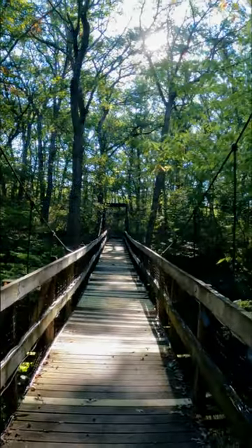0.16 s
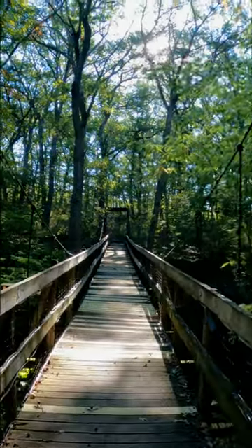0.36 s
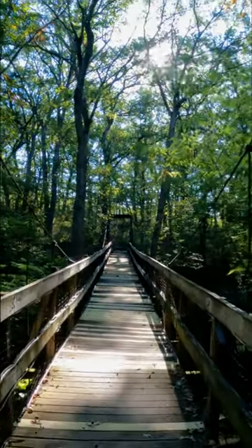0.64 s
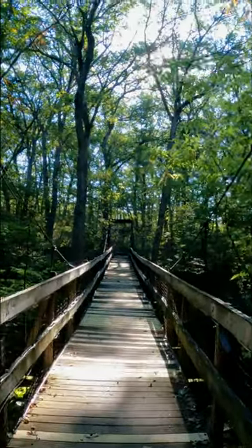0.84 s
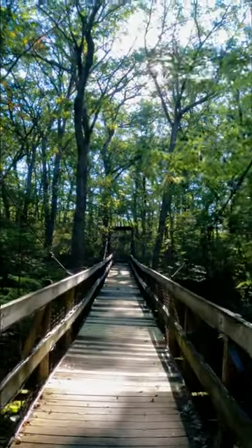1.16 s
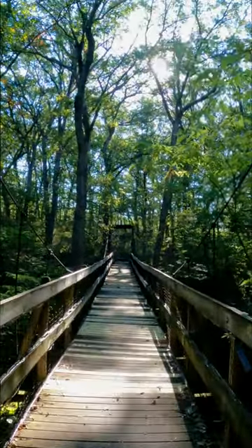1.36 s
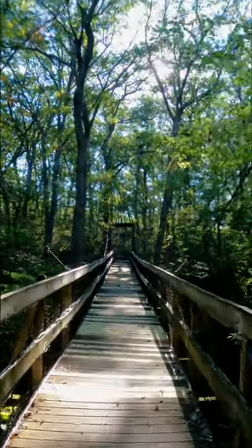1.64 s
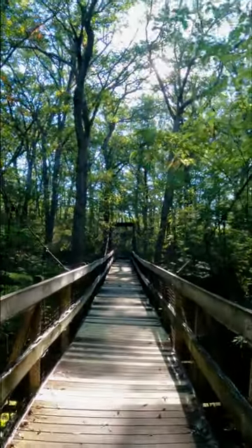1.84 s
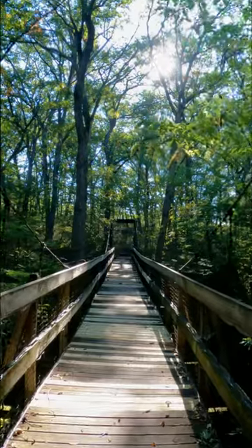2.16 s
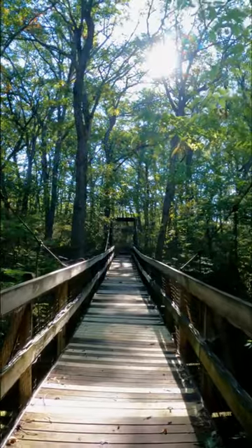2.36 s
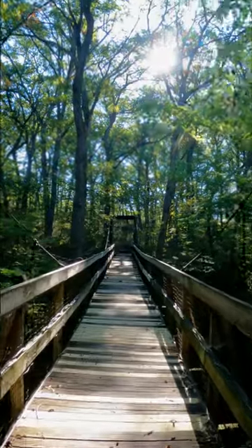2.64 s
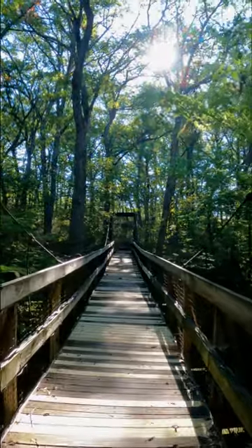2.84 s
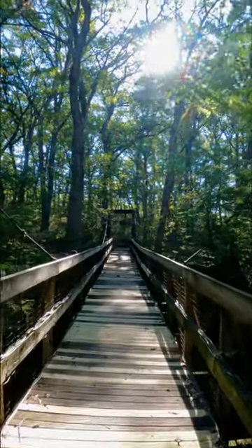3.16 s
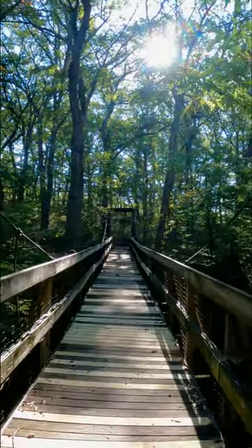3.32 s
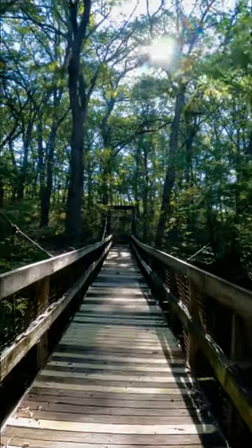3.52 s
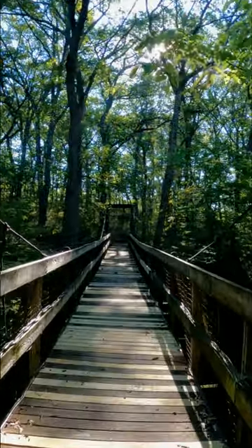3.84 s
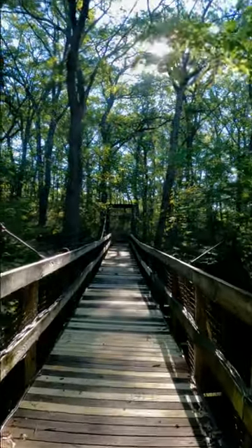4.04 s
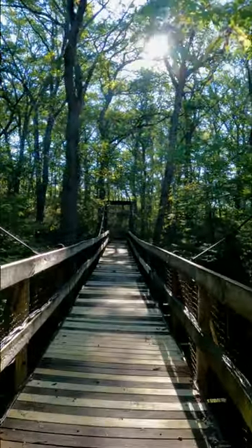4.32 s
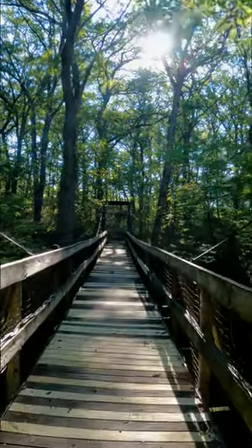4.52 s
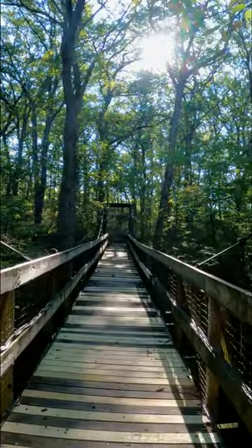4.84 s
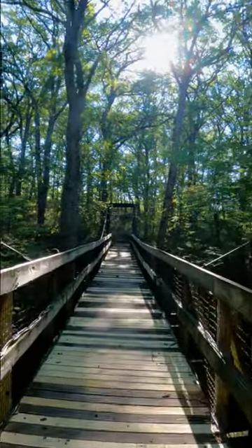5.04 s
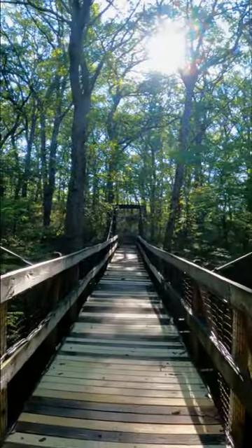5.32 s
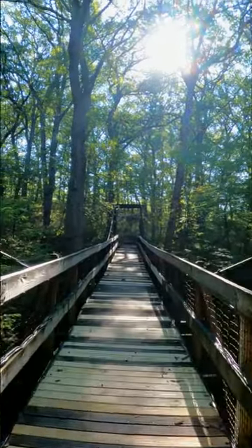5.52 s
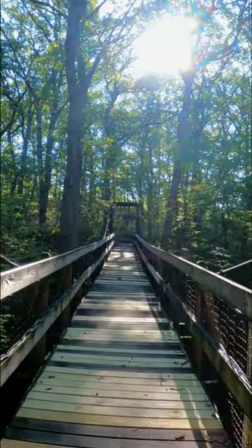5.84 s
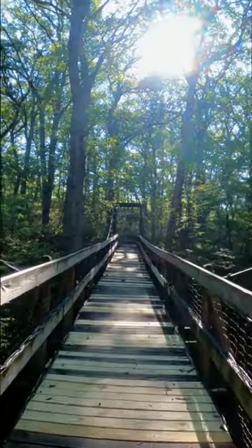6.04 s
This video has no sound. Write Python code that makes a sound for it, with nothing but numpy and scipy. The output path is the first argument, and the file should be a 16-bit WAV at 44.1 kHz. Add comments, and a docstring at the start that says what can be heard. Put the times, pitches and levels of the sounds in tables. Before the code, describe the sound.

A walker crosses a wooden suspension bridge in a forest at a slow pace, with steps about two thirds of a second apart. Each heel gives a dull hollow thud, often with a dry board crack and short rattle. A low span rumble swells underfoot. A dense, high insect chorus with fast trilling runs throughout, with soft leaf hush and faint distant whistles. The microphone is carried by the walker, close above the deck, outdoors in stereo.

```python
"""Footsteps on a plank bridge

Slow steps cross a hanging bridge in a wood: heels thud as short pushes ringing the deck, boards and grit
crack as bursts of noise ringing the wood, and the span shudders underfoot as low noise. Filtered noise makes
the dense insect chorus, its pulsing crickets and the hush of the trees; gliding sines make faint whistles.
"""
import sys
import numpy as np
from scipy import signal
from scipy.fft import rfft, irfft, next_fast_len
from scipy.io import wavfile
from scipy.ndimage import uniform_filter1d, map_coordinates

SR = 44100
rng = np.random.default_rng(int(sys.argv[2]) if len(sys.argv) > 2 else 0)


def bounce(signal):
    """Save signal as a 16-bit WAV file at the path given by the first command-line argument."""
    frames = np.transpose(np.atleast_2d(signal))
    limited = np.clip(frames, -1, 1)
    pcm = np.round(limited * 32767).astype(np.int16)
    wavfile.write(sys.argv[1], SR, pcm)


N = 272405  # length in samples


def amp(db):
    """Turn a level in dB into a gain."""
    return 10 ** (np.asarray(db) / 20)


def unit(x):
    """Scale x to rms 1."""
    return x / np.sqrt(np.mean(x ** 2) + 1e-20)


def along(points, hz):
    """Read a value between (Hz, value) points, with pitch on a log axis."""
    f, v = np.transpose(points)
    return np.interp(np.log(hz + 1), np.log(f + 1), v)


def wobble(rate):
    """Draw a smooth random curve through rate random points a second."""
    knots = rng.standard_normal(int(N * rate / SR) + 4)
    return map_coordinates(knots, [np.arange(N) * rate / SR])


def filtered(x, response):
    """Shape the spectrum of x by a gain (real or complex) that depends on frequency."""
    n = x.shape[-1]
    m = next_fast_len(n + SR // 8)  # spare room for the ringing
    return irfft(rfft(x, m) * response(np.fft.rfftfreq(m, 1 / SR)), m)[..., :n]


def dull(x, hz):
    """Soften x as wood and rubber do: a low-pass filter weakens what lies above hz."""
    return signal.sosfilt(signal.butter(4, hz, fs=SR, output="sos"), x)


def rung(push, modes, scatter_db=0):
    """Ring resonances with a push, their strengths changing with the spot struck; peak 1."""
    gains = amp(scatter_db * rng.standard_normal(len(modes)))

    def body(f):
        total = 0
        for k, (gain, (center, width, db)) in enumerate(zip(gains, modes)):
            resonance = 1j * f * width / (center * center - f * f + 1j * f * width)
            total = total + (-1) ** k * gain * amp(db) * resonance  # neighbours have opposite signs
        return total

    ring = filtered(push, body)
    return ring / np.abs(ring).max()


def rush(spectrum, alike, patchy_db):
    """Make stereo noise of rms 1 with patches of random gain; alike is how much the two sides match."""
    z = signal.stft(rng.standard_normal((2, N)), nperseg=512)[2]
    field = uniform_filter1d(rng.standard_normal(z.shape[1:]), size=5, axis=0)  # blur over pitch
    field = uniform_filter1d(field, size=8, axis=1)  # blur over time
    pair = signal.istft(z * amp(patchy_db * unit(field)), nperseg=512)[1][:, :N]
    turn = np.arccos(np.clip(alike, -1, 1)) / 2
    colored = filtered(pair, lambda hz: amp(along(spectrum, hz)))
    mid, side = colored * [[np.cos(turn)], [np.sin(turn)]]
    return unit(np.array([mid + side, mid - side]))


# Colour of the insect chorus: pitch_hz, relative level_db
INSECT_SPECTRUM = [(1940, -94), (3300, -29.5), (3790, -13), (4520, 4.5), (5710, 2.5), (6080, -5),
                   (6430, -11.5), (7620, -15.5), (8380, -23), (10400, -25.5), (12100, -26), (13400, -47),
                   (14000, -70)]
# Lean of the chorus: pitch_hz, lean_db (added on the left, taken off on the right)
TREBLE_LEFT = [(7000, 0.8), (12000, 3.5)]
INSECTS_DB = -44.5


def insects():
    """Countless insects blur into a shimmering band of noise, stronger on the left in the treble."""
    shimmer_db = .5 * wobble(13) + 0.094 * wobble(45) + 0.39 * wobble(1.0)
    chorus = amp(INSECTS_DB + shimmer_db) * rush(INSECT_SPECTRUM, alike=0.61, patchy_db=0.99)
    return filtered(chorus, lambda hz: amp(along(TREBLE_LEFT, hz) * [[1], [-1]]))


def pulsing(rate_hz, drift):
    """Wing strokes: a gate that opens about rate_hz times a second, drifting a little."""
    turns = np.cumsum(rate_hz * (1 + drift * wobble(2))) / SR
    return unit(np.sin(np.pi * turns) ** 4)


# Crickets in the chorus: pitch_hz, half_width_hz, pulses per second, level_db (before a slow wobble)
TRILL = (5842, 254, 35.5, -59)
# One higher insect, same columns (level_db before its swell too)
LONE = (9300, 150, 58.5, -77)
LONE_FROM_S, LONE_TO_S = 1.8, 5.3  # it swells and fades between these


def crickets(hz, half_width, rate_hz, db):
    """Wing strokes chop a narrow band of noise into a trill."""
    band = [(hz - 2 * half_width, -40), (hz - half_width, 0), (hz + half_width, 0), (hz + 2 * half_width, -40)]
    level = amp(db + 2.5 * wobble(3.08))
    return level * pulsing(rate_hz, drift=0.0604) * rush(band, alike=0.66, patchy_db=3.5)


def lone_insect():
    """A higher trill rises and falls once, along half a sine."""
    progress = np.clip((np.arange(N) / SR - LONE_FROM_S) / (LONE_TO_S - LONE_FROM_S), 0, 1)
    return np.sin(np.pi * progress) * crickets(*LONE)


# Colour of the hush in the leaves: pitch_hz, relative level_db
TREE_SPECTRUM = [(350, -44), (408, -7), (858, -2.5), (1200, 1), (1860, -5.5), (2920, -5), (3580, -5),
                 (4000, -15), (5200, -71)]
TREES_DB = -59.5


def trees():
    """Leaves hush softly: wide, patchy noise, a little stronger on the left."""
    level = amp(TREES_DB + 0.95 * wobble(14))
    return level * rush(TREE_SPECTRUM, alike=0.22, patchy_db=3.0) * amp([[.7], [-.7]])


# Colour of the bridge's slow sway: pitch_hz, relative level_db
SWAY_SPECTRUM = [(8.8, -62), (15, 1), (38, 5.5), (86, -8.5), (110, -18), (240, -120)]
# Colour of its quicker tremor: pitch_hz, relative level_db
TREMOR_SPECTRUM = [(41, -80), (70, -9.5), (112, -3.5), (183, 1.5), (222, -3.5), (275, -12), (700, -23),
                   (910, -40.5), (1540, -120)]
SWAY_DB, TREMOR_DB = -43.5, -47


def span():
    """The whole bridge sways and trembles: two layers of low noise with slightly wavering levels."""
    sway = amp(SWAY_DB + 0.41 * wobble(23.5)) * rush(SWAY_SPECTRUM, alike=0.85, patchy_db=3.0)
    tremor = amp(TREMOR_DB + 0.25 * wobble(14)) * rush(TREMOR_SPECTRUM, alike=0.49, patchy_db=3.0)
    return sway + tremor


def near(modes, hz, slope_db):
    """Modes close to the pitch of the spot struck ring most: slope_db less per octave away."""
    return [(c, w, db - slope_db * abs(np.log2(c / hz))) for c, w, db in modes]


# Grit dragged under the sole: start_s, level_db, pitch_hz, brightness_db (bright edge against the snap)
SCRAPES = [(0.249, -40.5, 2100, -16), (5.129, -44.5, 1140, 6), (5.41, -37.5, 3200, 5),
           (5.61, -30, 1606, 0.5), (5.834, -35, 1090, 6.5), (6.014, -26.5, 1770, -2.5),
           (6.089, -30, 3900, 4.5)]
# Board cracks, same columns
CRACKS = [(0.278, -28, 1900, -10), (0.2975, -22.5, 1320, 0.5), (0.385, -35, 1350, -29),
          (0.403, -18.5, 1600, -2.5), (0.4135, -24.5, 2100, 1.5), (0.428, -29.5, 2080, -21),
          (0.563, -37.5, 1350, -25), (0.576, -33, 2200, -9), (0.617, -39.5, 1360, -20),
          (1.165, -19, 1030, -5), (1.233, -34.5, 1020, -22), (1.567, -39, 2300, -3),
          (1.801, -28, 1250, -30), (2.528, -33, 1400, -21), (2.728, -31.5, 920, -24),
          (3.231, -25, 1130, -32), (3.926, -29, 1180, -20), (4.584, -29.5, 2700, -6),
          (4.609, -23, 1180, -26), (4.624, -32, 1500, -20), (4.683, -18.5, 1290, -11),
          (4.691, -24, 600, -22), (4.758, -36.5, 1240, -25), (5.304, -31, 1500, -27),
          (5.318, -25.5, 1400, -29), (5.388, -36, 1290, -20), (5.998, -24.5, 1290, -31),
          (6.109, -14.5, 1100, -3.5), (6.12, -22, 690, -27)]
# Resonances of a cracking board: pitch_hz, width_hz, level_db
SNAP = [(563, 380, 13), (1012, 230, 11.5), (1416, 320, 10), (2076, 1050, 7), (3360, 4100, 3.5)]
# Bright edge of a crack: pitch_hz, width_hz, level_db
GRIT = [(4370, 740, 30.5), (7570, 2700, 15.5), (11600, 13000, 9.5)]
SNAP_T60_S, SCRAPE_T60_S = .012, .04  # time for the main burst to fall 60 dB


def cracks(events, t60, rise_s, first):
    """Splinters or grit ring the board's upper modes, mostly to the left; first sizes an early sharp slip."""
    out, t = np.zeros((2, N + SR)), np.arange(SR // 8) / SR
    for s, db, hz, bright_db in events:
        shared, left, right = rng.standard_normal((3, len(t)))
        noise = shared + 0.75 * np.array([left, right])
        splinters = amp(3.94 * rng.standard_normal(len(t)))  # uneven sizes make it crackle
        fade = amp(-60 * t / t60) + amp(-17.5 - 60 * t / 0.105)  # a burst, then a gritty tail
        slips = (1 - np.exp(-t / rise_s)) * fade * splinters * noise
        slips[:, 30] -= first * np.abs(slips).max()
        snap = rung(dull(slips, hz=4400), near(SNAP, hz, slope_db=9.5)) * amp([[2.2], [-3]])
        quick = dull(slips * amp(-60 * t / 0.1), hz=11200)  # the treble dies first
        edge = rung(quick, GRIT, scatter_db=1) * amp([[3], [-5]])
        out[:, round(s * SR):][:, :len(t)] += amp(db) * (snap + amp(bright_db) * edge)
    return out[:, :N]


def trunks(x):
    """Echo x as a short dull answer from rails and boards, and a longer one from the wood."""
    t = np.arange(SR // 4) / SR
    boards = dull(rng.standard_normal((2, len(t))), hz=1820) * amp(-60 * t / 0.087)
    far = amp(-12.0 - 60 * t / 0.47) * rng.standard_normal((2, len(t)))  # trunks scatter it back faintly
    tail = (boards + far) * (t > .004)
    return signal.fftconvolve(x, tail / np.linalg.norm(tail[0]), axes=1)[:, :N]


# Footfalls and their bounces: start_s, level_db (of the blow), left_over_right_db,
# hardness_db (knock against blow; also brightens the blow), ring_s (base time, stretched for each part)
THUDS = [(0.461, -37.5, -17.5, -3, 0.06), (0.824, -28, -10, -22, 0.085), (1.164, -12, -0.5, -15, 0.14),
         (1.377, -30, -16, -10, 0.085), (1.799, -12.5, -0.5, -17.5, 0.081), (1.838, -9, 1, -39, 0.036),
         (1.959, -24.5, 1, -25, 0.03), (2.527, -17, 0, -26, 0.062), (2.661, -27, -16, -4.5, 0.076),
         (2.7, -24, -3, -12, 0.035), (2.731, -29, -1, -14, 0.16), (2.886, -30, -18, -8, 0.042),
         (3.228, -21, 0, -5.5, 0.1), (3.288, -30, -4, -8, 0.12), (3.403, -31.5, -3, -31, 0.28),
         (3.923, -25, 0, -9.5, 0.27), (4.073, -28.5, -8, -13.5, 0.15), (4.226, -28.5, -9, -18, 0.05),
         (4.608, -19, 1, -5.5, 0.084), (4.685, -23.5, 1, 0, 0.1), (4.818, -30, -17.5, -7, 0.099),
         (5.206, -33.5, -16, -3.5, 0.19), (5.301, -19.5, -3.5, -10, 0.16), (5.361, -31, -10, 0, 0.081),
         (5.425, -23.5, -13, -10.5, 0.1), (5.996, -17.5, 0, -7, 0.15), (6.112, -29.5, 1, 3.5, 0.17)]
# Low deck modes: pitch_hz, width_hz, level_db
DECK = [(107, 87, -16.5), (163, 24.8, -0.5), (214, 55.3, -6.5), (324.5, 88, -12.5)]
# The struck board: pitch_hz, width_hz, level_db
BOARD = [(330, 168, 8), (540, 180, 3), (740, 240, -12)]
# Loose boards: level after a 0 dB blow, dB gained per dB of blow
SHUDDER_DB, SHUDDER_GROWS = -15.5, 0.58


def thuds():
    """A heel pushes the deck once and scuffs a board; loose boards shudder on, unlike on each side."""
    out, t = np.zeros((2, N + SR)), np.arange(SR // 3) / SR
    for s, db, pan_db, hard_db, t60 in THUDS:
        push = -t / .0008 * np.exp(-t / 0.0012)  # soft sole: a millisecond-long blow
        soft_push = dull(push, hz=1200 * 2 ** (hard_db / 20))
        blow = rung(soft_push, DECK, scatter_db=2.0) * amp(-60 * t / (3 * t60))
        grit = amp(8.0 * rng.standard_normal(len(t)))  # uneven grains under the sole
        scuff = amp(-60 * t / (1.44 * t60)) * grit * rng.standard_normal((2, len(t)))
        blended = scuff + 0.55 * scuff[::-1]  # each side hears some of the other
        knock = rung(dull(blended, hz=643), BOARD, scatter_db=3.0)
        rattle = (1 - np.exp(-t / 0.0048)) * amp(-60 * t / (4 * t60)) * rng.standard_normal((2, len(t)))
        shudder = rung(dull(rattle, hz=415), DECK, scatter_db=2.0)
        both = (blow + amp(hard_db) * knock) * amp([[pan_db / 2], [-pan_db / 2]])
        step = amp(db) * both + amp(SHUDDER_DB + SHUDDER_GROWS * db) * shudder
        out[:, round(s * SR):][:, :len(t)] += step
    return out[:, :N]


# The walker's weight lands on the span, once a stride: start_s, peak_db
WEIGHT = [(0.461, -27.5), (0.825, -31), (1.163, -22.5), (1.798, -25), (2.525, -25.5), (3.229, -26),
          (3.599, -29), (3.922, -24), (4.61, -19), (5.297, -22.5), (5.997, -23.5)]
# The span under that weight: pitch_hz, width_hz, level_db
LURCH = [(32.7, 36.5, 2), (53.5, 74, -4)]


def lurches():
    """The span lurches under each stride: fading low noise rings its two deepest resonances."""
    out, t = np.zeros((2, N + SR)), np.arange(SR // 3) / SR
    for s, db in WEIGHT:
        shared, left, right = rng.standard_normal((3, len(t)))
        noise = shared + 0.7 * np.array([left, right])
        weight = dull(amp(-60 * t / 0.89) * noise, hz=105.0)
        out[:, round(s * SR):][:, :len(t)] += amp(db) * rung(weight, LURCH, scatter_db=4.0)
    return out[:, :N]


# Faint far whistles, perhaps birds: start_s, length_s, first_hz, last_hz,
# level_db (before swell, dips and pan)
WHISTLES = [(0.755, 0.26, 1660, 1666, -63.5), (1.24, 0.6, 3300, 4140, -67), (1.33, 0.22, 2880, 2860, -70),
            (2.2, 0.29, 1670, 1715, -65), (3.965, 0.3, 1760, 1700, -64.5), (4.43, 0.15, 2800, 2690, -66)]
EDGE_S, WHISTLE_PAN_DB = .03, 4  # fade at each end; lift on the left and cut on the right
GLIDE_SHARE = .85  # the glide settles after this share of the note


def whistles():
    """Thin wavering sines from the left swell as they rise and fade as they fall, with random dips."""
    out = np.zeros(N)
    waver_hz, dips_db = 24 * wobble(55), -5.5 * abs(wobble(26))
    for s, length, first_hz, last_hz, db in WHISTLES:
        t = np.arange(round(length * SR)) / SR
        now = slice(round(s * SR), round(s * SR) + len(t))
        glide = np.sin(np.pi / 2 * np.minimum(t / length / GLIDE_SHARE, 1)) ** 2  # fastest midway
        effort = t / length if last_hz > first_hz else 1 - t / length
        hz = first_hz + (last_hz - first_hz) * glide + waver_hz[now]
        edges = np.clip(np.minimum(t, length - t) / EDGE_S, 0, 1)
        shape = (0.59 + 1.3 * effort) * (hz / first_hz) ** 3 * edges
        tone = np.sqrt(2) * np.sin(2 * np.pi * np.cumsum(hz) / SR)  # rms 1
        out[now] += amp(db + dips_db[now]) * shape * tone
    return out * amp([[WHISTLE_PAN_DB], [-WHISTLE_PAN_DB]])


# One dry bump close on the right: start_s, click_db, push_db (both before panning)
POP = (4.5915, -10, -7.5)
# The bump's click: pitch_hz, width_hz, level_db
CLICK = [(950, 380, 4), (3990, 240, 0), (6020, 1650, -1.7)]
# The bump's push: pitch_hz, width_hz, level_db
PUSH = [(50.6, 13.6, 2.5), (170, 96, -3.5)]


def pop():
    """A single impulse rings a short click and a low push."""
    s, click_db, push_db = POP
    out, hit = np.zeros((2, N)), np.eye(1, SR // 8)[0]
    click = rung(dull(-hit, hz=6600), CLICK) * amp([[-9], [3]])
    push = rung(dull(np.gradient(hit), hz=480), PUSH) * amp([[-3], [2.5]])
    out[:, round(s * SR):][:, :len(hit)] = amp(click_db) * click + amp(push_db) * push
    return out


def scene():
    """Add up the wood, the bridge, the steps and the echo of the cracks."""
    woods = insects() + crickets(*TRILL) + lone_insect() + trees()
    scrapes = cracks(SCRAPES, SCRAPE_T60_S, rise_s=0.0077, first=0.25)
    snaps = scrapes + cracks(CRACKS, SNAP_T60_S, rise_s=0.00095, first=1.22)
    echo = amp(-13.5) * trunks(snaps)
    return woods + span() + snaps + echo + thuds() + lurches() + whistles() + pop()


TOP_HZ = 15020  # band limit


def record(dry):
    """Keep nothing above the band limit."""
    return filtered(dry, lambda hz: hz < TOP_HZ)


dry = scene()
out = record(dry)
bounce(out)
```